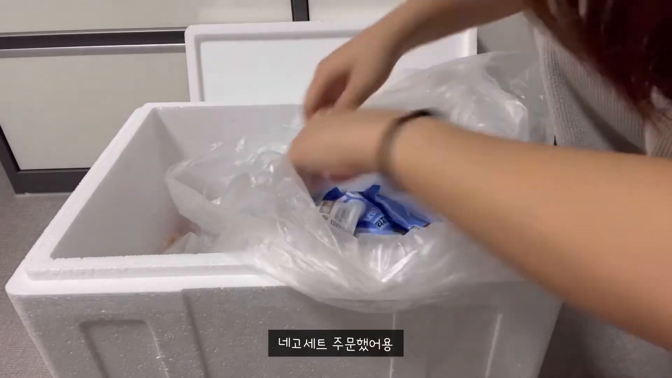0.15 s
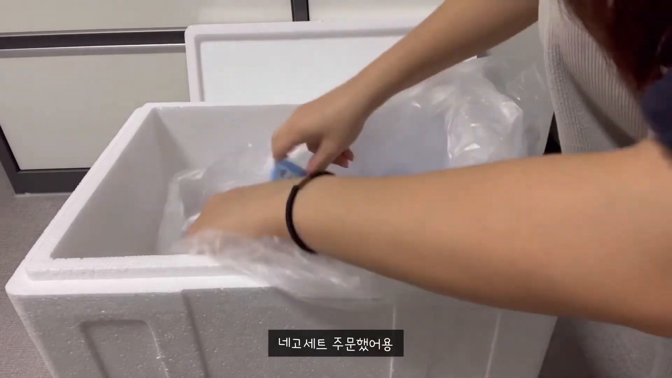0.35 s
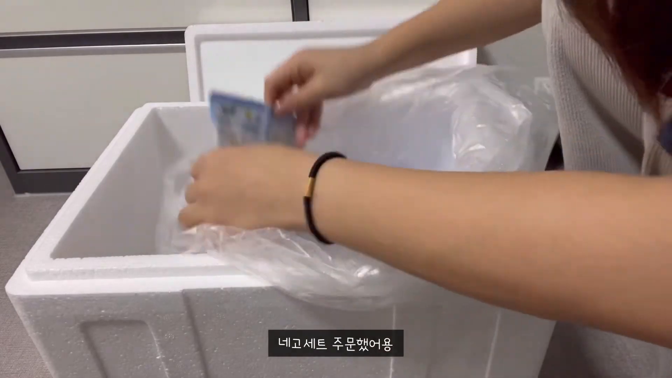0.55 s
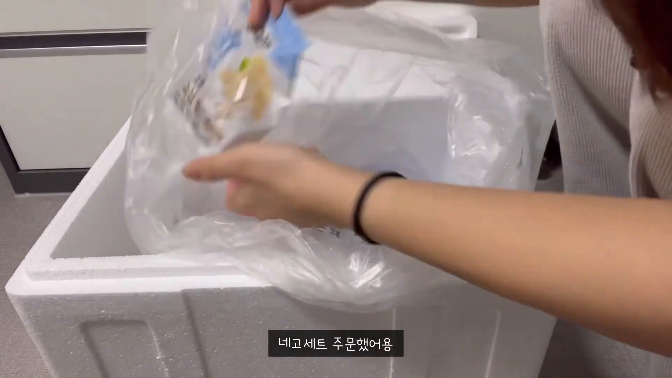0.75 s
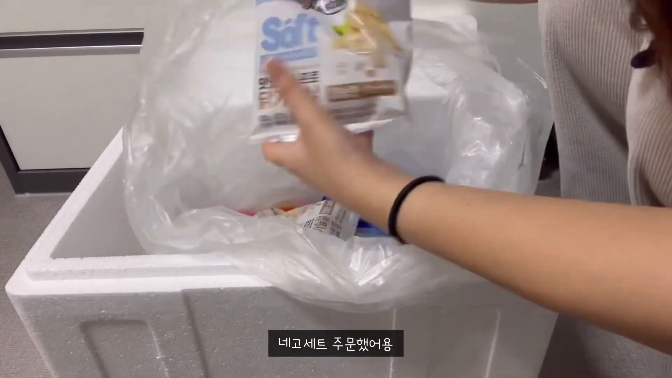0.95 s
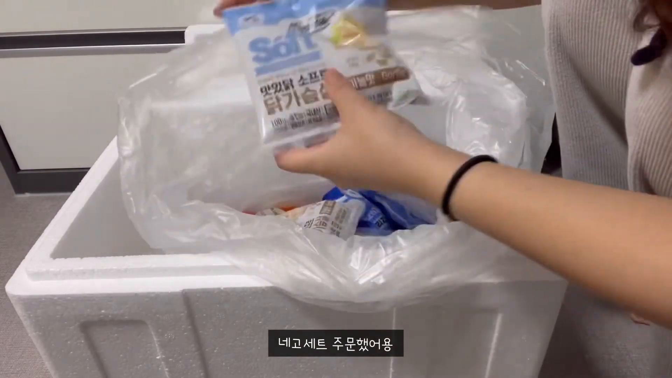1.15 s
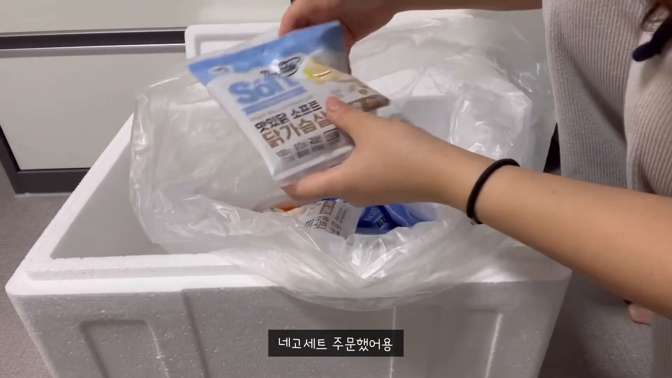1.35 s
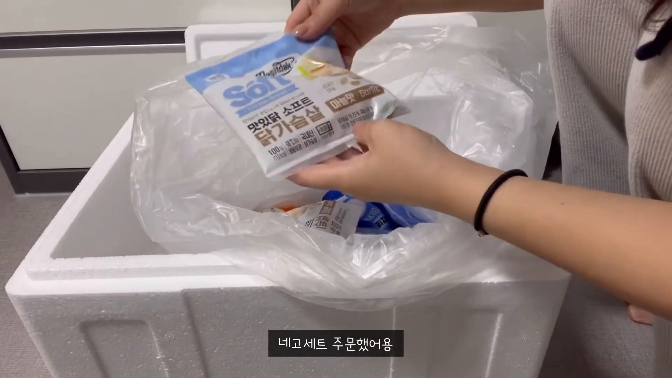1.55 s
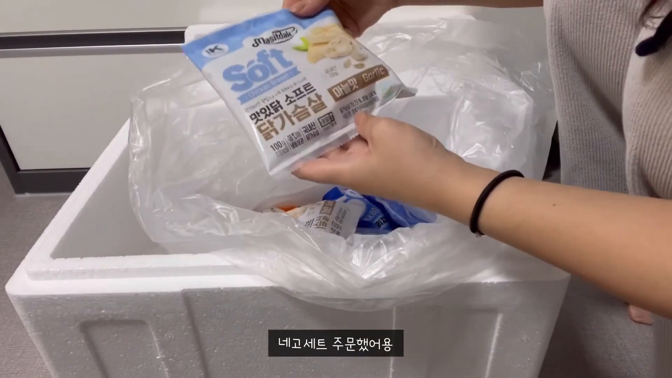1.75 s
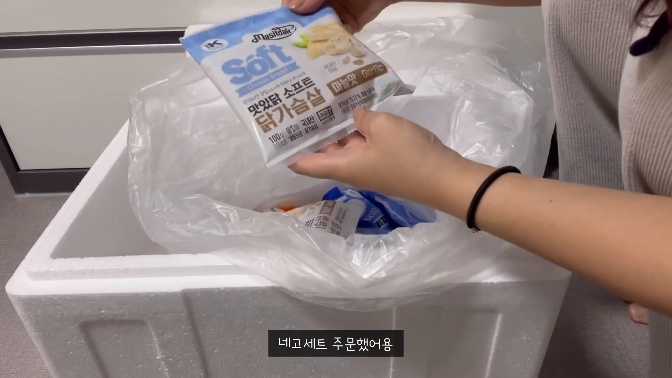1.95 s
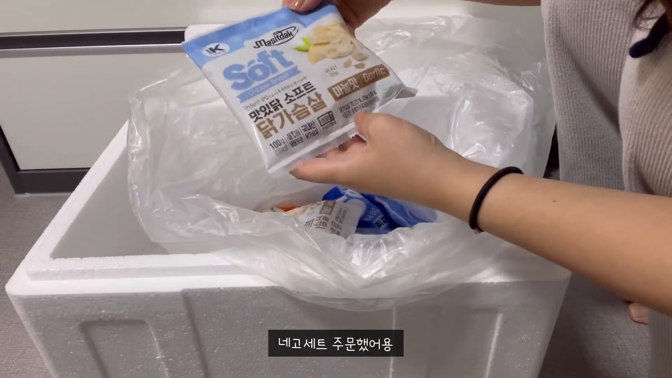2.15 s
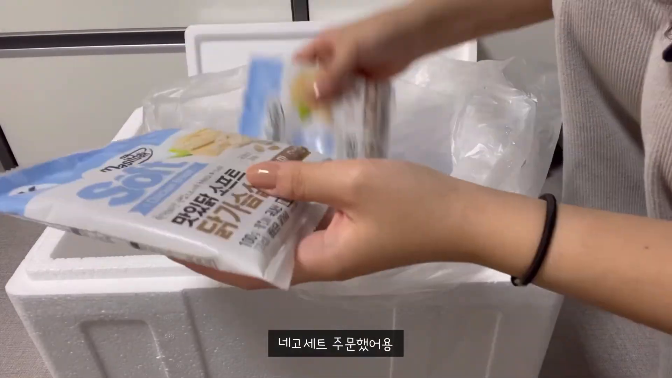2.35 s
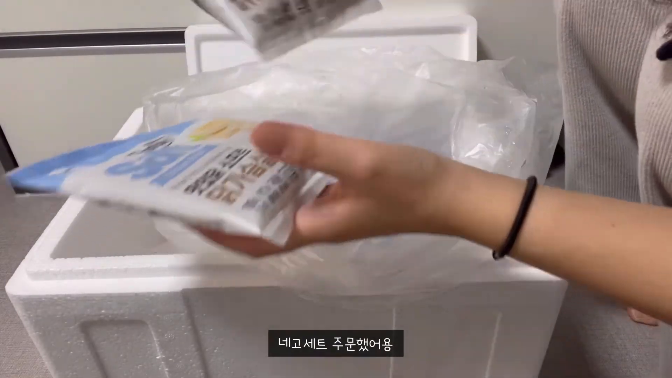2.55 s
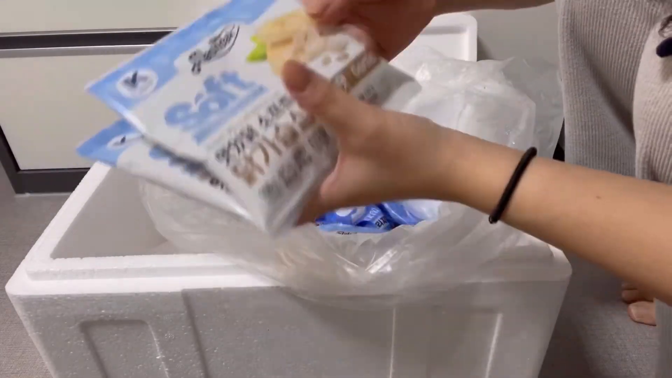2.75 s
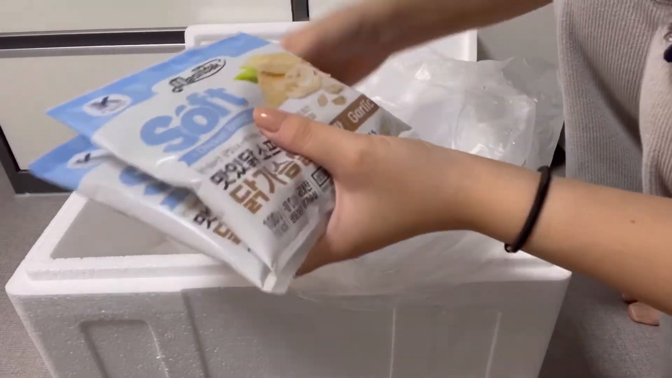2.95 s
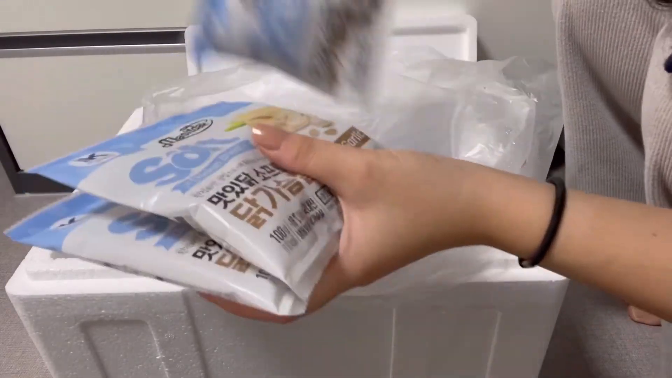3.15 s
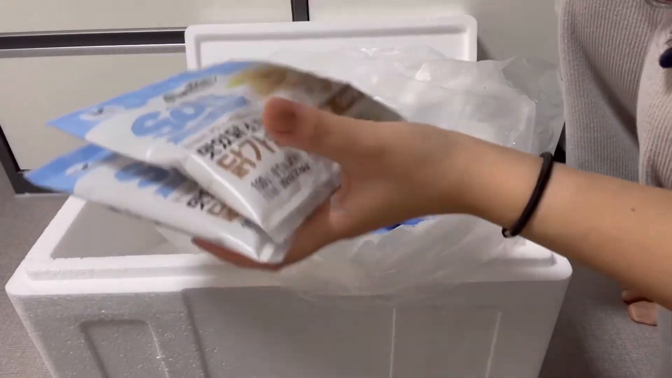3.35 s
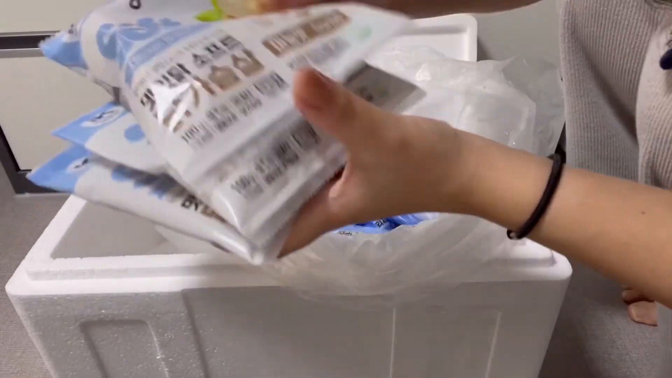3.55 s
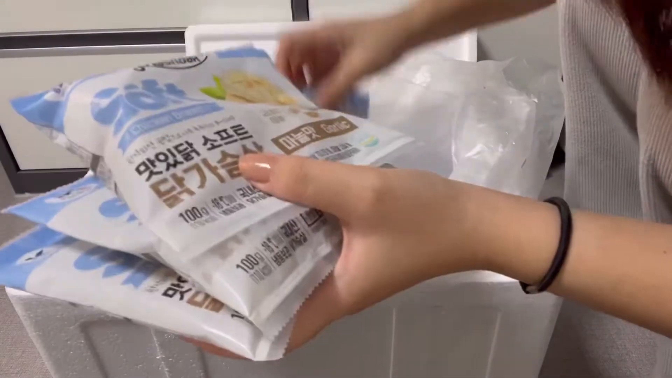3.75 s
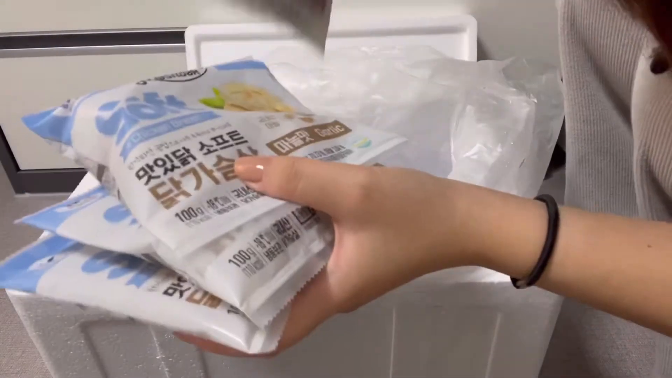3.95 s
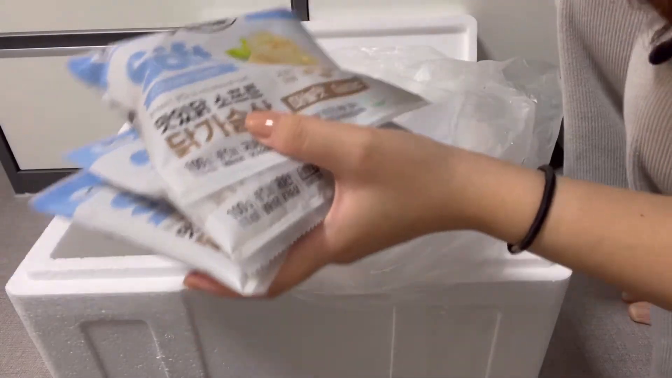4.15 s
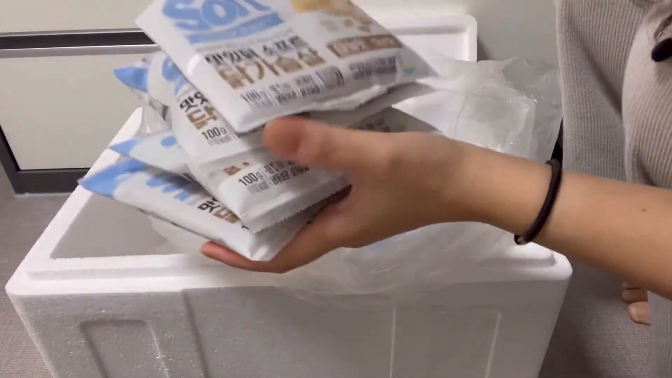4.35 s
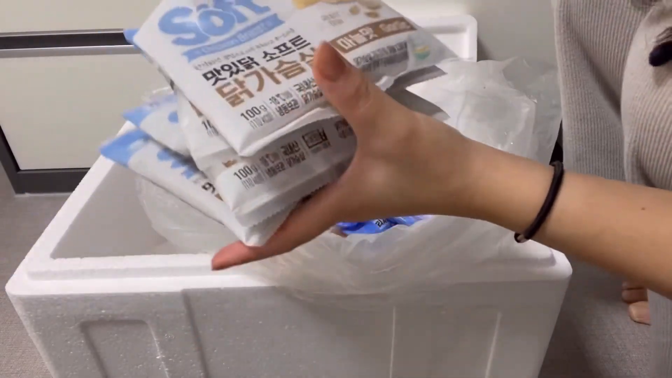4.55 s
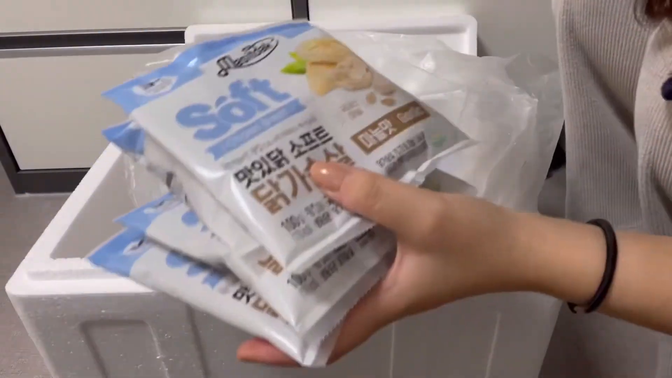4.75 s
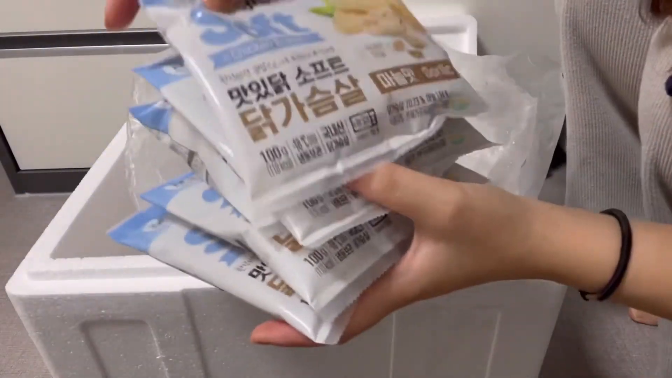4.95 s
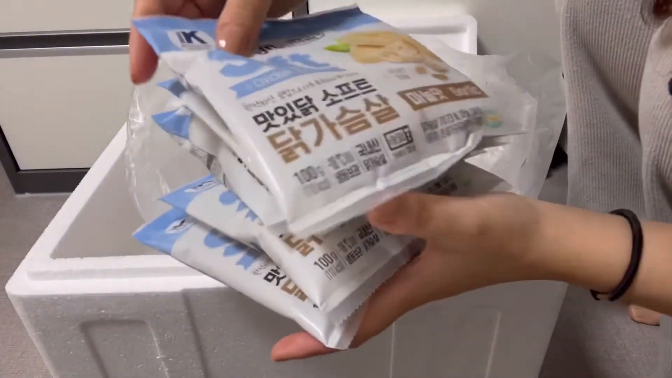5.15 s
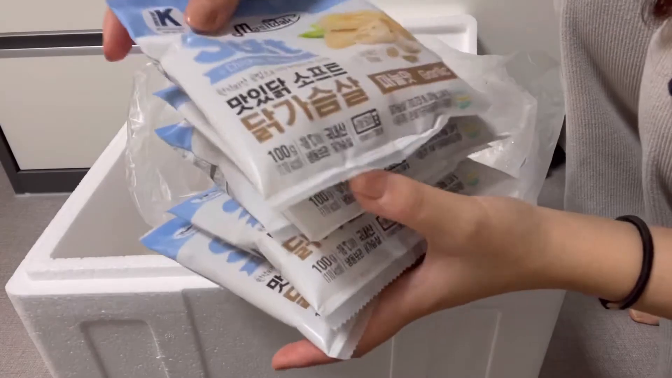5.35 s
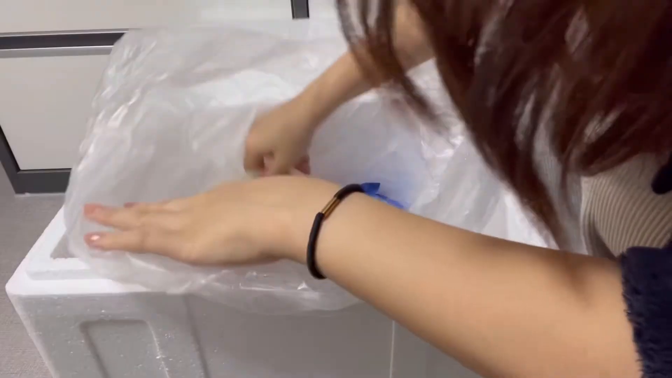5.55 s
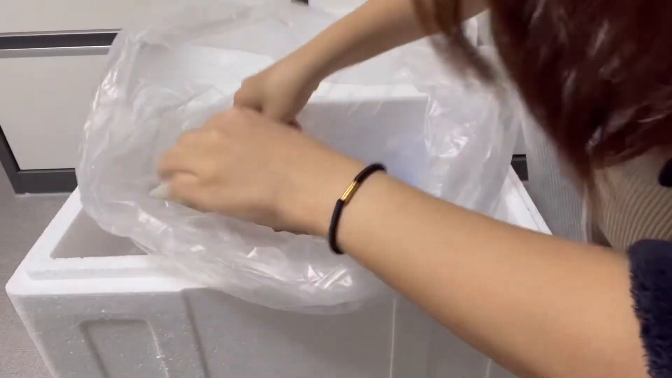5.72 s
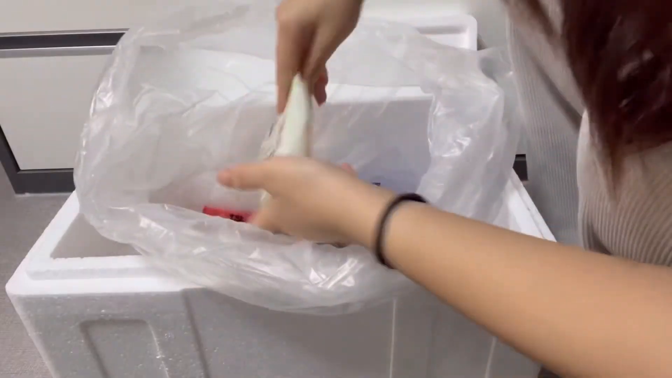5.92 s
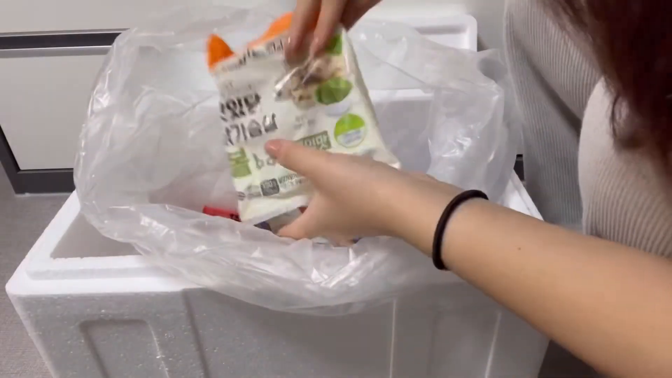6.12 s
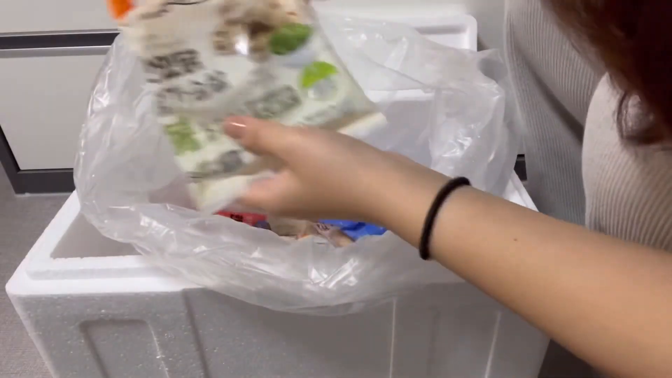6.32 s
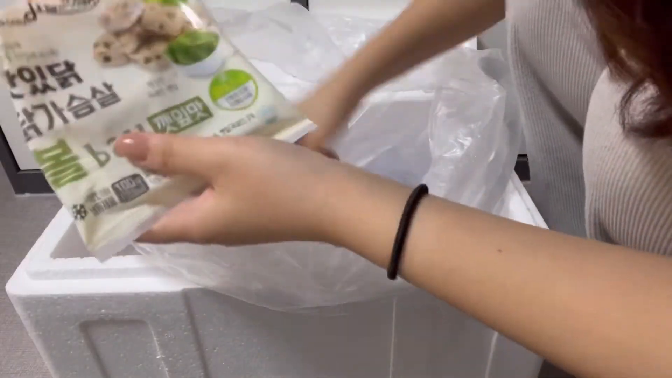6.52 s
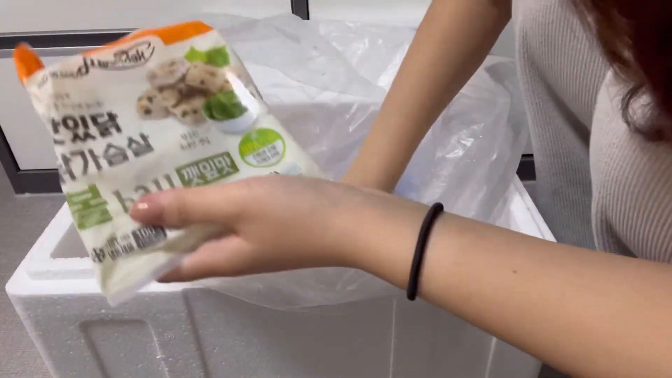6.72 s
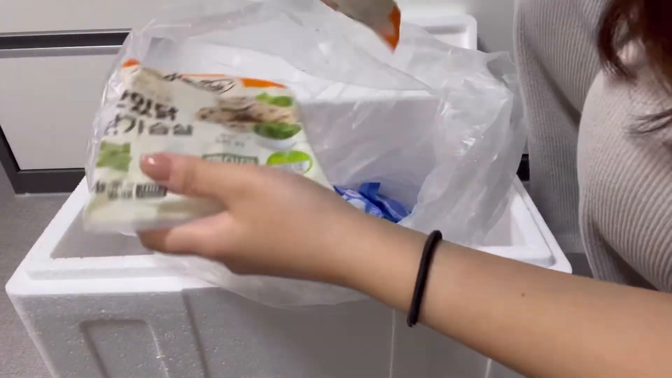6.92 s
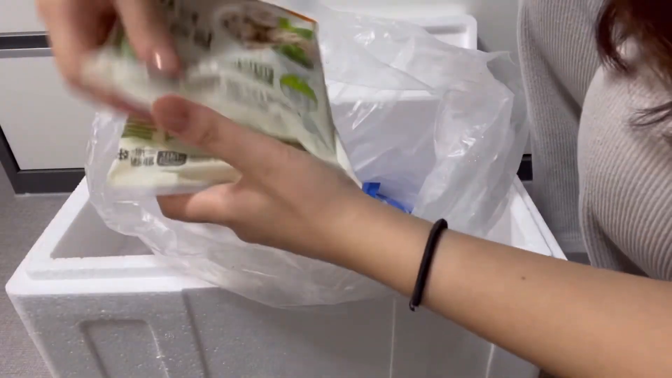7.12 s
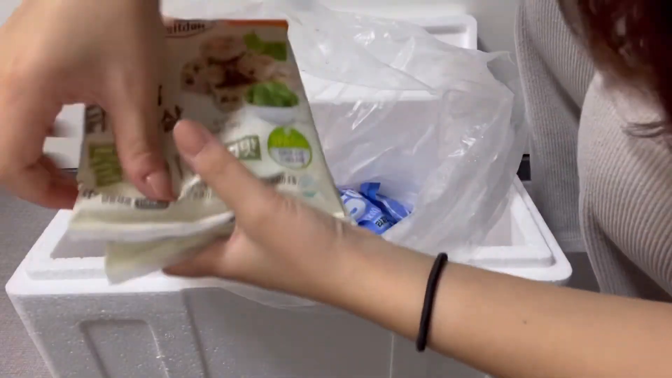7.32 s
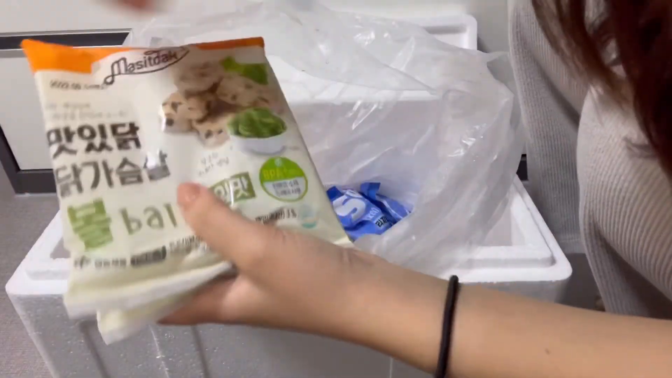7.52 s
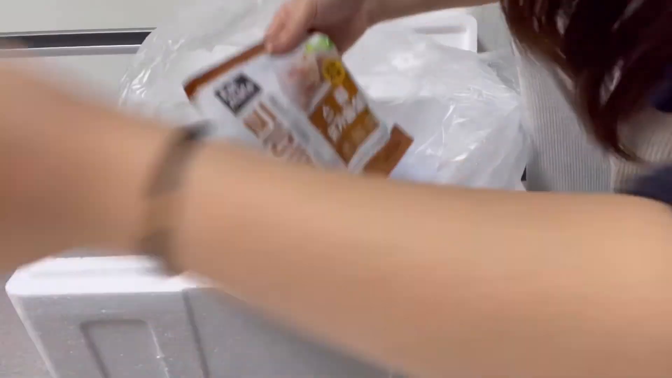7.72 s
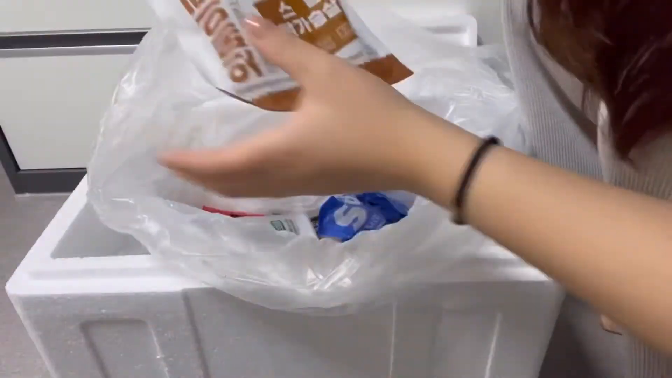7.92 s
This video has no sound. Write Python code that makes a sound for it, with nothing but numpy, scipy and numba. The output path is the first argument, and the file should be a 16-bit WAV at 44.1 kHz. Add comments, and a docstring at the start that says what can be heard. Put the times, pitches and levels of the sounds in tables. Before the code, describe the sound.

A thin plastic liner hisses and crinkles as hands push it aside in a foam box, then stiff sealed food packs snap and crackle. Six packs land in turn with crunchy slaps and dull puffy thuds, growing busier; the liner rustles again, a final pack slaps down, and the crackles thin out. Small dry room, close stereo microphones.

```python
"""Sealed plastic food packs are pulled from a thin bag liner in a foam box and stacked on one hand, in a small room.
First the liner hisses with tiny buckles as it is dragged aside, and stiff packs begin to snap crease by crease.
From 2.3 s to 5.2 s six packs land with a crunchy slap, a dull air-cushion note and a puff of air.
The liner then slides again, a last pack lands at 7.1 s, and squeezes and snaps thin out.
Filtered noise (still air, moved air) and a faint steady low hum lie beneath, heard by a close microphone pair."""
import sys
import numpy as np
from scipy import signal
from scipy.fft import rfft, irfft, next_fast_len
from scipy.io import wavfile
from scipy.ndimage import uniform_filter1d
from numba import njit

SR = 44100
rng = np.random.default_rng(int(sys.argv[2]) if len(sys.argv) > 2 else 0)


def materialize(psi):
    """Save the field psi as 16-bit PCM at rate SR to the path in sys.argv[1].

    A 1-D psi becomes a single channel; in a 2-D psi each row is a channel.
    """
    bounded = np.clip(np.atleast_2d(psi).T, -1, 1)
    quanta = np.round(bounded * 32767).astype(np.int16)
    wavfile.write(sys.argv[1], SR, quanta)


N = 351918

# Event levels below are relative: scene() trims them, and the registers, room and microphones shape them.

# Single creases snapping through. Each row: time in seconds, stiff film level in dB,
# thin film in dB over the stiff film, pitch of the crease in Hz.
CREASE_SNAPS = [(.0624, -71, 0, 2500), (0.125, -44, 3.5, 2200), (.582, -36, -9, 2300),
                (0.6346, -26.5, -5, 1900), (.7215, -26.5, -7, 1750), (0.8654, -26, -12, 2720),
                (0.9134, -26, -20, 1690), (1.1386, -32.5, -8, 2500), (1.3873, -30.5, 6.5, 2540),
                (1.471, -29, -7.5, 1880), (1.4942, -39.5, 10, 2900), (1.5189, -27.5, 2, 3320),
                (1.536, -32.5, 6, 2000), (1.5783, -32, -3.5, 1880), (1.6214, -25.5, -6.5, 2190),
                (1.6572, -30, -5, 2700), (1.8279, -52, -13, 1900), (1.986, -42, -11.5, 1670),
                (2.0091, -44.5, -26, 1660), (2.031, -47, -20, 1270), (2.1821, -43.5, -21, 970),
                (2.229, -33.5, 1, 2590), (2.2836, -34.5, -10, 1440), (2.303, -27.5, -3, 1590),
                (2.5578, -30, -11, 1900), (2.6603, -25, -8, 1880), (2.8037, -27.5, -14, 1600),
                (2.855, -26.5, -14, 1550), (2.902, -33.5, -38, 1630), (2.9648, -37, -40, 1250),
                (3.0126, -40, -21, 1480), (3.0802, -37.5, -8, 2000), (3.0921, -31, -3.5, 2200),
                (3.158, -39, -31, 1530), (3.2393, -39.5, -34, 1880), (3.319, -38, -26, 1620),
                (3.4243, -22, -15, 3000), (3.4817, -27, -16, 2110), (3.5148, -28.5, -5, 2500),
                (3.549, -33, 1.5, 2090), (3.6797, -29, -0.5, 2120), (3.702, -22.5, -22, 3060),
                (3.8743, -35.5, -17, 1700), (3.9186, -27.5, -7, 1990), (4.0652, -42.5, -3.5, 1770),
                (4.215, -15, -0.5, 2100), (4.238, -21, -22, 1940), (4.4171, -24.5, -4.5, 2120),
                (4.4513, -23, -6, 2310), (4.53, -26.5, -5, 2000), (4.5535, -28, -11, 2400),
                (4.565, -31, 0, 1700), (4.5854, -29, -7, 1800), (4.5987, -26.5, -8, 2000),
                (4.6434, -24, -14, 1320), (4.6471, -29.5, -14, 1700), (4.814, -19.5, -12, 790),
                (4.865, -20.5, -4.5, 1660), (4.888, -27, -17, 2600), (4.9881, -24, -5, 2340),
                (5.0237, -21, -7.5, 1750), (5.1116, -26, -15, 1750), (5.1556, -19, 2, 1870),
                (5.1852, -21.5, -6.5, 980), (5.3655, -38, -8, 2630), (5.4033, -35, -30, 1040),
                (5.4463, -25, -20, 2240), (5.9084, -39.5, -3, 2700), (6.07, -37.5, -2.5, 2000),
                (6.1265, -34, 2, 1800), (6.141, -36, 6, 2300), (6.1925, -31, -24, 1760),
                (6.246, -35, -3, 1700), (6.283, -34.5, -6, 1570), (6.5806, -34.5, -25, 1340),
                (6.7058, -34, -5, 2300), (6.97, -32.5, 1.5, 2190), (7.0555, -16, -15.5, 1120),
                (7.1662, -25, -5, 1670), (7.1813, -28, 0.5, 2080), (7.2164, -26.5, -5.5, 1700),
                (7.2428, -33, -9, 1800), (7.2984, -31, -22, 1590), (7.341, -24.5, -0.5, 1900),
                (7.3993, -34, -1, 2310), (7.4477, -38.5, -3, 2000), (7.4856, -28.5, -7, 2740),
                (7.6522, -53, 12, 3000)]
# Packs landing on the stack. Each row: time in seconds, stiff film level in dB, hollow body in dB over it,
# thin film in dB over it, T60 in seconds, note of the air cushion in Hz.
PACK_LANDINGS = [(2.303, -37, 1.5, -2, 0.12, 207), (2.658, -28, -4.5, -5.5, .19, 139),
                 (3.419, -19, -2, -7, 0.2, 208), (4.212, -24.5, -2.5, -4.5, 0.21, 213),
                 (4.81, -21.5, -3.5, -7, 0.15, 136), (5.183, -32.5, -3, -7, 0.064, 259),
                 (7.057, -30, -3.5, -6.5, 0.24, 230)]
# Fingers squeezing or shifting a pack. Each row: start in seconds, length in seconds, stiff film level in dB,
# hollow body in dB over it, thin film in dB over it.
PACK_SQUEEZES = [(0.879, 0.056, -35.5, -5, -2.5), (1.374, 0.052, -47.5, 1, 4),
                 (1.491, 0.074, -38.5, -9.5, -7), (1.591, 0.088, -46.5, 0, -5.5),
                 (1.822, 0.026, -56, -18, 0.5), (1.969, 0.1, -60, 4.5, -12), (2.212, 0.026, -51, 9.5, -10),
                 (2.433, 0.065, -63.5, -11, 5), (2.547, 0.033, -45.5, -13, -1),
                 (2.739, 0.12, -37, -3.5, -12), (2.955, .03, -52, 6, -35), (3.073, 0.026, -45, -7, -3),
                 (3.228, 0.1, -51.5, -0.5, -22), (3.506, 0.11, -47, 4.5, -12), (3.618, 0.13, -38, -4, -5.5),
                 (3.905, 0.054, -45, 4.5, -11.5), (4.102, 0.066, -48.5, 3, -36),
                 (4.259, 0.094, -42.5, 0, -12), (4.406, 0.11, -43.5, -1, -6), (4.531, 0.092, -34, -8, -6),
                 (4.851, 0.03, -33, -5, -9), (4.973, .08, -40, -6, -14), (5.122, .11, -38, 1, -4),
                 (5.435, .022, -31.5, -26, -16), (6.075, 0.13, -37.5, -6.5, -11.5),
                 (6.215, 0.078, -46, -23, -9), (6.57, 0.075, -42, 2.5, -6.5), (6.656, 0.096, -41.5, 0, -18),
                 (6.78, 0.07, -44.5, -1, -3), (6.948, 0.031, -39.5, -8, -2),
                 (7.154, 0.15, -37.5, -10.5, -15), (7.31, 0.16, -54.5, -8, -13)]
SQUEEZE_RISE_S, SQUEEZE_T60_S = 0.016, 0.12
# Restlessness of the hands holding the packs. Each row: time in seconds, level in dB.
HAND_RESTLESSNESS = [(0, -67), (1.05, -49.5), (1.68, -60.5), (1.8, -72.5), (2.15, -72.5), (2.25, -64.5),
                     (2.72, -51), (2.93, -62), (3.85, -56), (4.05, -58), (4.77, -59.5), (4.92, -49.5),
                     (5.4, -50), (6.03, -52), (6.4, -56), (6.92, -62), (7.02, -49.5), (7.55, -57),
                     (7.98, -61.5)]
# Share of each register in a held pack. Values: hollow body, stiff film, thin film, in dB.
HELD_REGISTERS_DB = [-4, -1, -2]
# Thin liner dragged or pushed aside. Each row: start in seconds, length in seconds, level in dB.
LINER_SLIDES = [(-.08, 0.027, -35), (0.119, 0.23, -33.5), (0.355, 0.4, -34.5), (.93, 0.066, -36.5),
                (1.077, .14, -44), (3.652, 0.07, -38.5), (4.36, 0.14, -46.5), (5.432, 0.13, -32.5),
                (5.59, 0.23, -42), (5.82, 0.18, -51), (6.072, 0.075, -46.5), (6.626, 0.055, -41),
                (7.147, .13, -46.5), (7.732, 0.055, -51)]
SLIDE_RISE_S, SLIDE_T60_S = 0.069, 0.39
# Share of each register in the liner. Values: hollow body, stiff film, thin film, in dB.
LINER_REGISTERS_DB = [-7.5, -7, 1]
# Filled packs bumping the box, the hand or each other. Each row: time in seconds, level in dB, pitch in Hz.
PACK_BUMPS = [(0.885, -26.5, 94), (1.218, -33.5, 288), (1.417, -29.5, 184), (2.557, -34, 235),
              (2.771, -28, 144), (2.853, -22.5, 266), (3.64, -20, 167), (3.977, -30.5, 331),
              (4.563, -26, 241), (6.108, -31, 177), (6.582, -26, 135), (7.165, -28, 297)]
# Sweeping arms pushing air. Each row: start in seconds, length in seconds, level in dB.
ARM_WAFTS = [(.85, 0.2, -56), (2.72, 0.2, -55), (3.748, 0.58, -55), (4.786, .07, -45), (5.46, .3, -49.5),
             (5.917, 0.3, -53), (6.788, 0.048, -42), (7.2, 0.65, -57)]
WAFT_RISE_S, WAFT_T60_S = 0.096, 0.15

# Spectrum of the hollow pack body. Each row: frequency in Hz, density in dB per Hz.
BODY_SPECTRUM = [(30, -34), (70, -21.5), (120, -1.5), (200, 0.5), (310, 0.5), (480, -9), (650, -14),
                 (1000, -32), (2000, -83)]
# Spectrum of the stiff film. Each row: frequency in Hz, density in dB per Hz.
STIFF_SPECTRUM = [(200, -50), (450, -19.5), (620, 2), (1100, 1), (1550, -0.5), (2000, 1.5), (2400, -2.5),
                  (3100, -2.5), (3900, -7.5), (5000, -11), (8000, -65)]
# Spectrum of the thin film. Each row: frequency in Hz, density in dB per Hz.
THIN_SPECTRUM = [(1800, -47), (3200, -8.5), (4200, 1), (6000, -6.5), (7500, -2), (9000, -0.5), (10700, -3),
                 (12500, -8), (15500, -8), (17000, -34)]
REGISTERS = [BODY_SPECTRUM, STIFF_SPECTRUM, THIN_SPECTRUM]
# Ringing of a buckle, one row per register. Each row: T60 in seconds at or below the register's median pitch,
# share of the buckles that reach it, before their size counts.
BUCKLE_RINGING = [(0.053, .09), (0.014, .6), (0.001, 1)]
LINER_SPREAD_DB, PACK_SPREAD_DB = 0, 4  # inequality of the buckles
SNAP_BODY_DB, SNAP_BODY_DB_PER_OCTAVE, PANEL_HZ = -11.5, -1, 2000  # lower panels stir the body more
CUSHION_DB, PUFF_DB = 7, -18  # note and puff of a landing, over its hollow body

# Reverberation of the room. Each row: frequency in Hz, T60 in seconds.
ROOM_T60 = [(100, 0.22), (400, 0.1), (2000, 0.19), (8000, 0.25), (16000, 0.26)]
# Still air of the room. Each row: frequency in Hz, density in dB per Hz.
AIR_SPECTRUM = [(25, -21), (60, -8), (200, 8), (320, -6), (500, -20), (1500, -9), (5000, -31), (16000, -28)]
# Phase between the microphones. Each row: frequency in Hz, lead of the left in radians.
LEFT_LEAD = [(20, 0), (800, -.1), (1800, -.4), (2900, -.9), (4500, -.6), (6000, -1.3), (7200, -.9),
             (8000, -.2), (8700, 0), (10000, 1.1), (11500, 2.8), (12400, 3.2), (13600, 4.7), (15200, 6.2)]
# Gain of the side signal. Each row: frequency in Hz, gain in dB.
SIDE_GAIN = [(40, 3), (150, -8.5), (350, 0.5), (1200, -2.5), (2500, -2), (4500, 3), (6800, 3), (7800, -5),
             (12000, -61), (16000, -31)]
TOP_HZ = 15900


def amp(db):
    """Decibels to gain."""
    return 10 ** (np.asarray(db) / 20)


def unit(x):
    """Scale to rms 1."""
    return x / np.sqrt(np.mean(x ** 2) + 1e-20)


def along(points, hz):
    """Read (Hz, value) points on a log frequency axis."""
    point_hz, values = np.transpose(points)
    return np.interp(np.log(hz + 1), np.log(point_hz), values)


def curves(rows):
    """One value per sample for each column after the time."""
    s, *columns = np.transpose(rows)
    return [np.interp(np.arange(N) / SR, s, column) for column in columns]


def filtered(x, response):
    """Multiply the spectrum of x by a response of frequency."""
    size = next_fast_len(N + 8192)
    spectrum = rfft(x, size) * response(np.fft.rfftfreq(size, 1 / SR))
    return irfft(spectrum, size)[..., :N]


def add(track, s, sound):
    """Mix a sound into a track at time s, clipped to the track."""
    part = track[..., max(round(s * SR), 0):][..., :sound.shape[-1]]
    part += sound[..., :part.shape[-1]]


def ringing(shape_db):
    """Minimum-phase impulse response of a dB spectrum, by folding its cepstrum."""
    cepstrum = irfft(np.log(np.maximum(amp(shape_db), 1e-6)))
    half = len(cepstrum) // 2
    fold = np.r_[1, np.full(half - 1, 2), 1, np.zeros(half - 1)]
    return irfft(np.exp(rfft(cepstrum * fold)))


def snaps(lives_s, rises_s, trims_db, focus_db, ripple_db, lead_s, scatter, size=1024):
    """A crease flips: a crisp tick first, then the panel rings round its pitch and the air cushion answers last."""
    t, hz = np.arange(size) / SR, np.fft.rfftfreq(size, 1 / SR)
    shapes = [along(register, hz) for register in REGISTERS]
    swells = [amp(-60 * t / life) * (1 - np.exp(-t / rise)) ** 2 for life, rise in zip(lives_s, rises_s)]
    focuses_db = (0, focus_db, 0)  # only the stiff film gathers round the crease pitch
    out = np.zeros((2, N))
    for s, stiff_db, thin_db, pitch_hz in CREASE_SNAPS:
        body_db = SNAP_BODY_DB + SNAP_BODY_DB_PER_OCTAVE * np.log2(pitch_hz / PANEL_HZ)
        levels_db = stiff_db + np.array([body_db, 0, thin_db])
        # every fold has resonances of its own
        ripple = np.interp(np.sqrt(hz / SR), np.linspace(0, .7, 70), rng.standard_normal(70))
        modes_db = ripple_db * ripple
        off_pitch = np.minimum(np.log2((hz + 1) / pitch_hz) ** 2, 4)
        for shape, level_db, trim, swell, focus in zip(shapes, levels_db, trims_db, swells, focuses_db):
            panel = ringing(shape + modes_db - focus * off_pitch)
            burst = swell * rng.standard_normal((2, size))
            pair = irfft(rfft(burst, 2 * size) * rfft(panel, 2 * size))
            pair *= np.sqrt(.005 * SR) / np.linalg.norm(pair, axis=1, keepdims=True)
            add(out, s - lead_s, amp(level_db + trim) * pair * [[1], [scatter]])
    return out


def slaps(rise_s, hold_s, level_db):
    """A landing pack crushes many creases at once, then settles."""
    t = np.arange(SR // 2) / SR
    levels = np.zeros((3, N))
    for s, stiff_db, body_db, thin_db, t60_s, _ in PACK_LANDINGS:
        crush = np.minimum(t / rise_s, 1) * amp(-60 * np.maximum(t - hold_s, 0) / t60_s)
        gains = amp(stiff_db + level_db + np.array([body_db, 0, thin_db]))
        add(levels, s - rise_s / 2, gains[:, None] * crush)
    return crackle(levels, spread_db=2.63, rate_hz=3300, own_db=0, even_s=0.013, scatter=0.91)


def thumps(level_db, t60_s, rise_s):
    """The air cushion of a sealed pack gives a short, dull note when it is bumped or lands."""
    t = np.arange(SR // 4) / SR
    out = np.zeros((2, N))
    landings = [(s, db + body_db + CUSHION_DB, hz) for s, db, body_db, _, _, hz in PACK_LANDINGS]
    for s, db, hz in PACK_BUMPS + landings:
        envelope = amp(db + level_db - 60 * t / t60_s) * (1 - np.exp(-t / rise_s))
        add(out[0], s, envelope * np.sin(2 * np.pi * hz * t))
    return out


def rustle(slide_db, squeeze_db, catch_db):
    """The sliding liner buckles finely and evenly; gripped packs buckle coarsely, catching and slipping."""
    s, length_s, db = np.transpose(LINER_SLIDES)
    liner_db = np.add.outer(LINER_REGISTERS_DB, db + slide_db)
    liner_power = strokes(s, length_s, liner_db, SLIDE_RISE_S, SLIDE_T60_S)

    s, length_s, db, body_db, thin_db = np.transpose(PACK_SQUEEZES)
    squeezes_db = np.array([db + body_db, db, db + thin_db]) + squeeze_db
    pack_power = strokes(s, length_s, squeezes_db, SQUEEZE_RISE_S, SQUEEZE_T60_S)
    held_db = np.add.outer(HELD_REGISTERS_DB, curves(HAND_RESTLESSNESS)[0])
    pack_power = pack_power + amp(held_db) ** 2

    # share of the packs in the stiff film
    grip = np.sqrt(pack_power[1] / (pack_power[1] + liner_power[1]))
    spread_db = LINER_SPREAD_DB + (PACK_SPREAD_DB - LINER_SPREAD_DB) * grip
    catching = np.interp(np.arange(N), np.linspace(0, N, 560), rng.standard_normal(560))
    levels = np.sqrt(liner_power + pack_power) * amp(catch_db * catching * grip)
    return crackle(levels, spread_db, rate_hz=4800, own_db=3, even_s=0.053, scatter=0.8)


def crackle(levels, spread_db, rate_hz, own_db, even_s, scatter):
    """Random buckles ring as damped sines with pitches and directions of their own, following the level curves."""
    at = np.flatnonzero(rng.random(N) < rate_hz / SR)
    size_db = np.broadcast_to(spread_db, N)[at] * np.minimum(rng.exponential(size=N)[at], 4.5)
    grid_hz = np.arange(1, SR // 2, 2.)
    out = np.zeros((2, N))
    for register, (t60_s, share), level in zip(REGISTERS, BUCKLE_RINGING, levels):
        # one set of draws per 8 samples
        reach, place, sign, own, side = rng.random((N // 8 + 1, 5))[at // 8].T
        # the larger a buckle, the more surely it stirs a register
        reached = reach < share * amp(size_db / 2)
        kicks = amp(size_db + own_db * (2 * own - 6)) * np.sign(sign - .5) * reached
        # the hand feeds in a steady power, however it is shared among the buckles
        power = np.bincount(at, kicks ** 2, N)
        power = uniform_filter1d(power, int(even_s * SR))
        power = uniform_filter1d(power, int(even_s * SR / 2))
        # pitches are likeliest where the register is strong
        odds = np.cumsum(amp(along(register, grid_hz)) ** 2)
        pitch_hz = np.interp(place, odds / odds[-1], grid_hz)
        # above the median pitch a buckle lasts a fixed number of cycles
        decay = np.log(1000) / (t60_s * SR) * np.maximum(pitch_hz / np.median(pitch_hz), 1)
        kicks = kicks * level[at] * 2 * np.sqrt(decay / (np.abs(power[at]) + 0.0011))
        side_kicks = kicks * scatter * (2 * side - 1)
        poles = np.exp(2j * np.pi * pitch_hz / SR - decay)
        on = np.abs(kicks) > 1e-7
        out += ring_out(at[on], kicks[on], side_kicks[on], poles[on], int(t60_s * SR), N)
    return out


@njit
def ring_out(starts, mid, side, poles, length, total):
    """Sum of damped sines as mid and side, each a rotating, shrinking phasor."""
    out = np.zeros((2, total))
    for i in range(len(starts)):
        z = 1 + 0j
        for k in range(starts[i], min(starts[i] + length, total)):
            out[0, k] += mid[i] * z.imag
            out[1, k] += side[i] * z.imag
            z *= poles[i]
    return out


def strokes(s, length_s, levels_db, rise_s, t60_s):
    """Power of overlapping movements that rise, hold and die away; one track per row of levels."""
    t = np.arange(0, N / SR, .001)
    age = t - s[:, None]
    fall = amp(-60 * np.maximum(age - length_s[:, None], 0) / t60_s)
    shape = np.clip(age / rise_s, 0, 1) * fall
    return np.array([np.interp(np.arange(N) / SR, t, amp(db) ** 2 @ shape ** 2) for db in levels_db])


def room(x, gap_s, build_s):
    """Diffuse answer of the walls: decaying noise, a new tail for each half second as the hands move on."""
    wet = np.zeros((2, N))
    step = SR // 2
    for start in range(0, N, step):
        hz, t, z = signal.stft(rng.standard_normal((2, SR // 3)), SR, nperseg=256)
        decay = amp(-60 * t / along(ROOM_T60, hz)[:, None])
        tail = signal.istft(z * decay, SR, nperseg=256)[1]
        tail = tail * np.clip((np.arange(tail.shape[1]) / SR - gap_s) / build_s, 0, 1)
        tail = tail / np.linalg.norm(tail[0])
        add(wet, start / SR, signal.fftconvolve(x[None, start:start + step], tail, axes=1))
    return wet


def draught(puff_s):
    """Strength of the air moved by arms and by landing packs."""
    puffs = [(s, puff_s, db + body_db + PUFF_DB) for s, db, body_db, *_ in PACK_LANDINGS]
    s, length_s, db = np.transpose(ARM_WAFTS + puffs)
    return np.sqrt(strokes(s, length_s, [db], WAFT_RISE_S, WAFT_T60_S)[0])


def background(hum_hz, hum_db, air_db):
    """Low hum as a sine, still air as filtered noise, moved air as soft low noise pushes."""
    hum = amp(hum_db) * unit(np.sin(2 * np.pi * hum_hz * np.arange(N) / SR))
    air_noise = filtered(rng.standard_normal((2, N)), lambda hz: amp(along(AIR_SPECTRUM, hz)))
    air = amp(air_db) * unit(air_noise)
    push_points = [(15, -30), (30, -49), (50, 12), (85, 3.5), (160, -5), (500, -85)]  # Hz, dB
    push = unit(filtered(rng.standard_normal(N), lambda hz: amp(along(push_points, hz))))
    return np.array([air[0] + hum + draught(puff_s=0.036) * push, air[1]])


def scene():
    """Plastic, room and background as mid and side, then left and right."""
    sliding = rustle(slide_db=0.0, squeeze_db=-0.5, catch_db=3.5)
    # snap triples: hollow body, stiff film, thin film
    hits = snaps(lives_s=(.016, .009, .006), rises_s=(.002, .0009, .0006), trims_db=(-2, -1, -1.2),
                 focus_db=5.0, ripple_db=2.5, lead_s=.0004, scatter=0.69)
    hits = hits + slaps(rise_s=0.013, hold_s=0.01, level_db=1)
    hits = hits + thumps(level_db=-0.5, t60_s=0.074, rise_s=0.0044)
    walls = room(amp(-9.0) * sliding[0] + amp(-10.5) * hits[0], gap_s=0.001, build_s=0.0033)
    mid, side = sliding + hits + walls + background(hum_hz=63.2, hum_db=-68, air_db=-81.5)
    side = filtered(side, lambda hz: amp(along(SIDE_GAIN, hz)))
    return np.array([mid + side, mid - side])


def record(dry):
    """The two microphones differ in phase and slightly in level; both ends of the band are cut."""
    tilt_points = [(120, 0.43), (300, -0.73), (1200, -0.49), (5500, -0.44), (8000, -0.15)]  # Hz, left dB

    def microphones(hz):
        """Response of the left and right microphone."""
        turn = np.exp(.5j * along(LEFT_LEAD, hz))
        tilt = amp(along(tilt_points, hz))
        low_cut = 1 / np.sqrt(1 + (42 / (hz + 1)) ** 12)
        return np.array([turn * tilt, turn.conj() / tilt]) * low_cut * (hz < TOP_HZ)
    return filtered(dry, microphones)


dry = scene()
out = record(dry)
materialize(out)
```